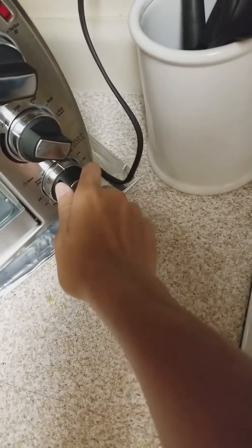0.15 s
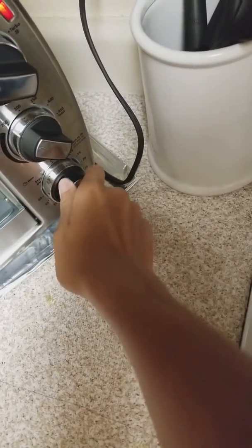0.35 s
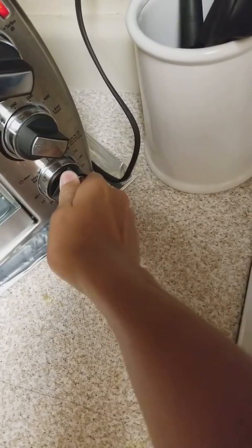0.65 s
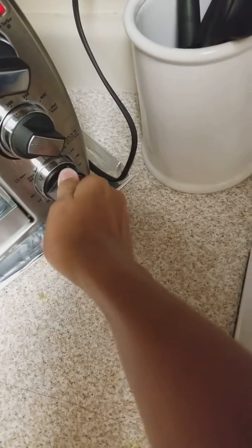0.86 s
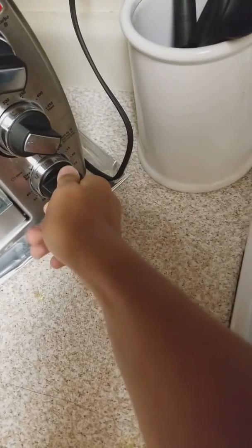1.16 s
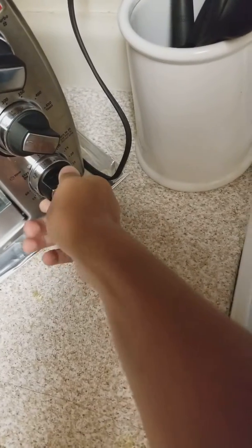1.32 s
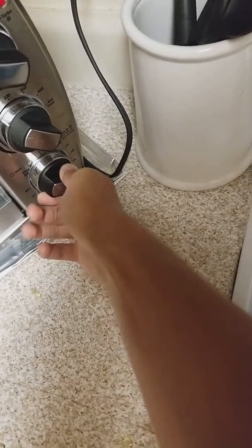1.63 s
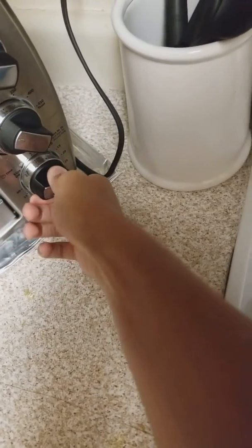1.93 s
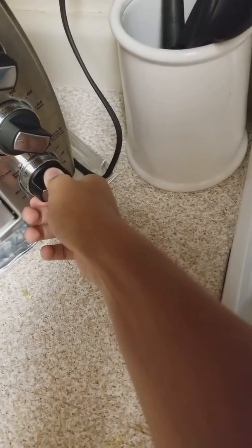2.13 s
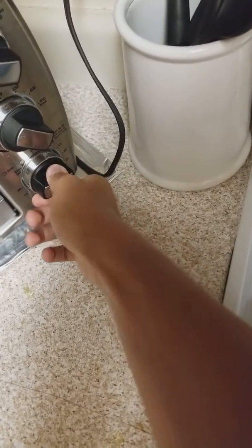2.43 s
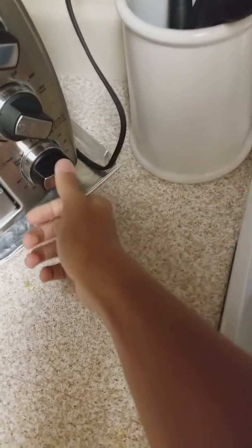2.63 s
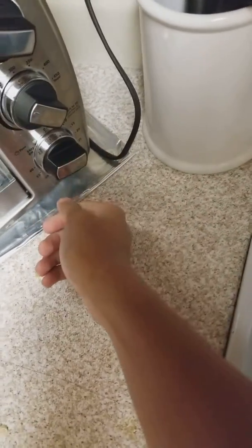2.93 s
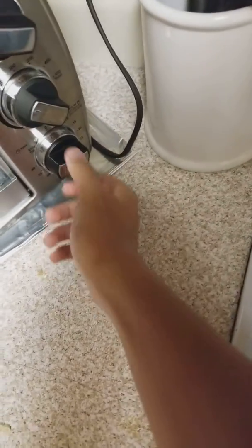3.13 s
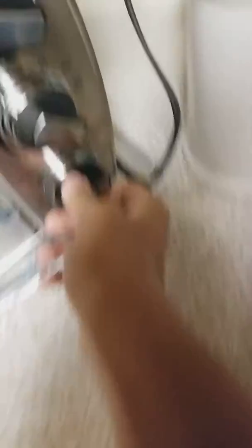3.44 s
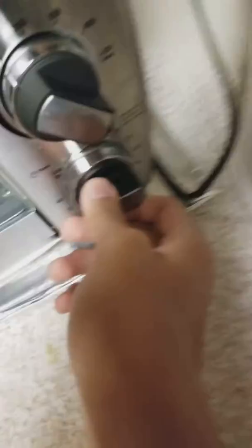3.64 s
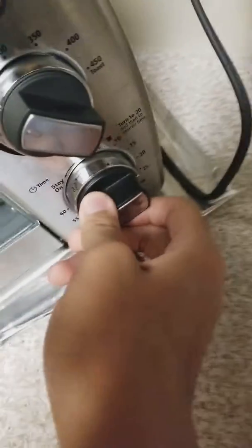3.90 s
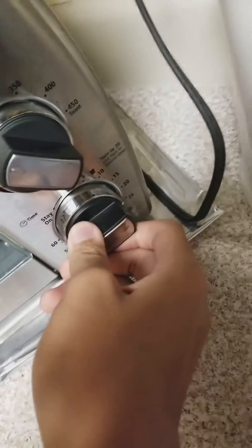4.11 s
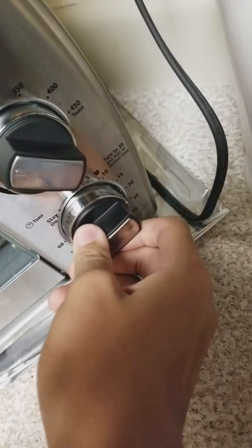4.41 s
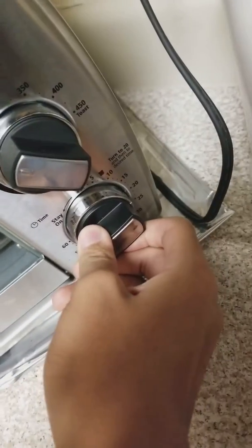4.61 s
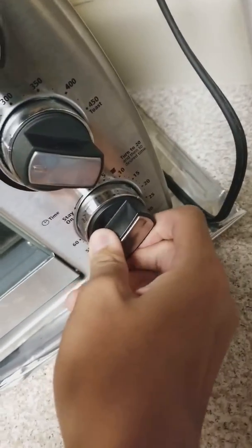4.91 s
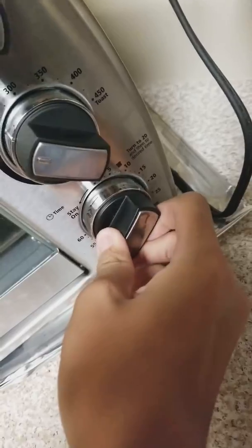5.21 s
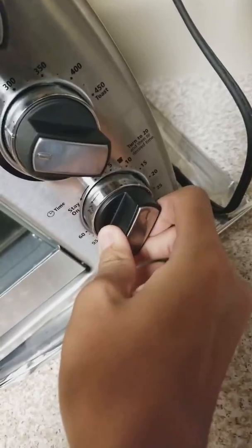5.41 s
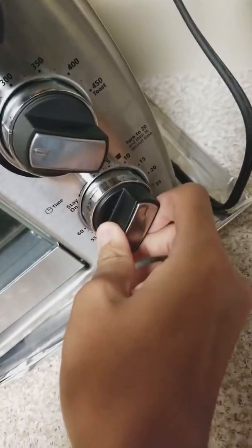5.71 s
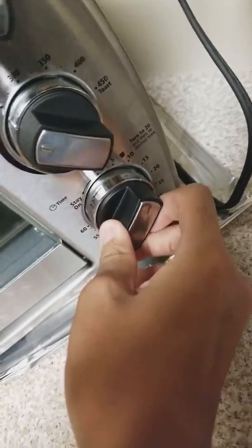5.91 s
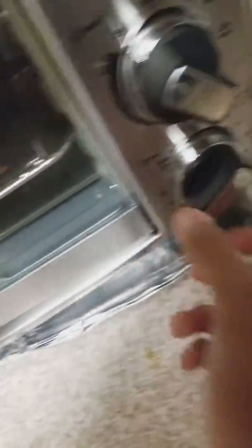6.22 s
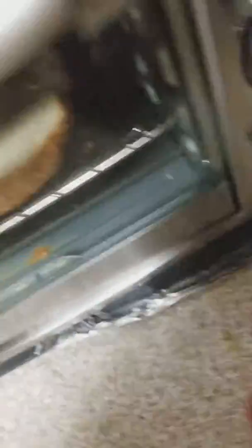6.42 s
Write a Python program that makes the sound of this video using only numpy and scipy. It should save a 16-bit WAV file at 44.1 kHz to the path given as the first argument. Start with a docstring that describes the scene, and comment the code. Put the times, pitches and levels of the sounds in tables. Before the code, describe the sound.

Ratcheting whirr of a wound toaster oven timer, then sharp metallic ticking, a knob click, short rasp and louder ticks above low electrical hum.

```python
"""In a kitchen, the clockwork timer of a toaster oven is wound by hand; its ratchet whirrs, then it ticks.
The hand takes the knob again with a click, nudges it, leans on it so that it ticks harder, and snaps off it.
Whirr, ticks and rasps are bursts of coloured noise with ringing metal; the knob's knocks are short decaying tones.
A motor and the mains hum as slightly wavering sine waves over the soft noise of the room.
About halfway through, the listening place moves close to the oven."""
import sys
import numpy as np
from scipy import signal
from scipy.fft import rfft, irfft, next_fast_len
from scipy.io import wavfile
from scipy.ndimage import uniform_filter1d, map_coordinates

SR = 44100
rng = np.random.default_rng(int(sys.argv[2]) if len(sys.argv) > 2 else 0)


def to_wav(sig):
    """Store sig (one row per channel, or 1-D mono) as 16-bit WAV at the path in sys.argv[1].

    Samples outside -1..1 are clipped; the rate is SR.
    """
    pcm = np.clip(np.atleast_2d(sig), -1, 1) * 32767
    pcm = np.round(pcm).astype(np.int16)
    wavfile.write(sys.argv[1], SR, pcm.T)  # frames by channels


N = 288855  # length [samples]
TOP_HZ = 15800  # nothing is kept at or above this frequency


def amp(db):
    """Turn decibels into a gain."""
    return 10 ** (np.asarray(db) / 20)


def unit(x):
    """Scale a sound to an average (rms) level of 1."""
    return x / np.sqrt(np.mean(x ** 2) + 1e-20)


def along(points, hz):
    """Read a curve of (frequency, value) points on a logarithmic frequency axis."""
    f, v = np.transpose(points)
    return np.interp(np.log(hz + 1), np.log(f + 1), v)


def curves(rows):
    """Draw one value per sample for each column after the time."""
    s, *cols = np.transpose(rows)
    return [np.interp(np.arange(N) / SR, s, c) for c in cols]


def wobble(rate):
    """Draw a smooth random curve through `rate` random points a second."""
    points = rng.standard_normal(int(N * rate / SR) + 4)
    return map_coordinates(points, [np.arange(N) * rate / SR])


def filtered(x, response):
    """Multiply each frequency of a sound by a response."""
    n = x.shape[-1]
    m = next_fast_len(n + 8192)  # silence added at the end leaves room for the filter's ringing
    spectrum = rfft(x, m) * response(np.fft.rfftfreq(m, 1 / SR))
    return irfft(spectrum, m)[..., :n]


def noise(colour, size):
    """Make two unrelated noises, left and right, with a given colour and rms 1."""
    white = rng.standard_normal((2, size))
    return unit(filtered(white, lambda hz: amp(along(colour, hz))))


def treble(x, edge_hz):
    """Take the part of a sound above a soft edge."""
    return filtered(x, lambda hz: hz ** 4 / (hz ** 4 + edge_hz ** 4))


def pan(db):
    """Give the gains of left and right for a left-minus-right difference in dB."""
    return amp(np.array([[db], [-db]]) / 2)


def add(track, s, sound):
    """Mix a sound into a track at time s."""
    part = track[..., max(round(s * SR), 0):][..., :sound.shape[-1]]
    part += sound[..., :part.shape[-1]]


def swells(rows):
    """Make a gain that rises to each (time, level, rise, fall) row's peak and dies away again."""
    t = np.arange(N) / SR
    return sum(amp(db - np.maximum(rise * (s - t), fall * (t - s))) for s, db, rise, fall in rows)


# Where we listen from, 0 = afar, 1 = close by: (time [s], closeness [0-1])
LISTENING_PLACE = [(3.0, 0), (3.7, 0.99)]


def closeness(s):
    """Tell how close to the oven we listen at time s; near sounds and far sounds mix by this."""
    return np.interp(s, *np.transpose(LISTENING_PLACE))


# Ringing tones of the steel case: (frequency [Hz], level [dB], time to fade by 60 dB [s])
CASE_TONES = [(1350, -3, 0.069), (1608, 1, 0.1), (1756, -3, 0.2), (1900, 2.5, 0.13), (1988, 5, 0.07),
              (2150, 1.5, 0.18), (2284, -2, 0.15), (2690, -1, 0.11), (3570, -10, 0.19), (3820, -4, 0.13),
              (4740, -17, 0.092), (5700, -5, 0.087), (6170, 1, 0.071), (7160, 1, 0.048), (8200, 4, 0.035)]


def case_ring(t):
    """Ring the case's clear tones as fading sines, with new strengths for each blow and each side."""
    ring = 0
    for hz, db, t60 in CASE_TONES:
        level_db = db + rng.normal(0, 0.62, (2, 1))
        start = rng.random((2, 1))  # in cycles
        ring = ring + amp(level_db - 60 * t / t60) * np.sin(2 * np.pi * (hz * t + start))
    return ring


def ratchet(colour, teeth_rate, scatter_db, ring_db, t60, grit_db, grit_t60=0.0024, count=8):
    """Gear teeth meet at uneven moments, each with a gritty click that rings the metal; rms 1."""
    t = np.arange(SR // 4) / SR
    meets = rng.random(N) < teeth_rate / SR  # on average teeth_rate a second
    teeth = meets * amp(scatter_db * rng.standard_normal(N))
    fade = np.hypot(amp(-60 * t / t60), amp(grit_db - 60 * t / grit_t60))
    # teeth land on different spots, so each takes one of a few responses
    spot = rng.integers(0, count, N)
    out = 0
    for k in range(count):
        response = noise(colour, len(t)) * fade + amp(ring_db) * case_ring(t)
        here = (teeth * (spot == k))[None]
        out = out + signal.oaconvolve(here, response, axes=1)[:, :N]
    return unit(out)


# Two turns of the knob with a short slackening between them, before the overall settings below:
# (time [s], level of the case's grind [dB], level of the teeth's hiss [dB])
KNOB_TURNS = [(0.31, -44, -52), (0.372, -34, -36.5), (0.432, -40, -41), (0.506, -38.5, -40.5),
              (0.544, -44.5, -43), (0.568, -36, -41), (0.586, -42, -42), (0.65, -37, -41.5),
              (0.71, -52, -50), (0.72, -41, -50), (0.73, -47, -48), (0.758, -40.5, -43.5),
              (0.842, -44, -44), (0.85, -38.5, -41.5), (0.906, -42.5, -45), (0.944, -38.5, -44.5),
              (1.0, -42, -42.5), (1.028, -35, -41), (1.056, -41, -41.5), (1.158, -42, -45.5),
              (1.412, -40, -42), (1.426, -36.5, -40.5), (1.524, -39.5, -42), (1.57, -49, -54)]
# Colour of the case's grind: (frequency [Hz], level [dB per Hz])
GRIND_COLOUR = [(150, -17), (500, -13.5), (1150, -11.5), (1350, 1), (1490, -8), (1650, -6), (1890, 3),
                (2250, -3.5), (2600, -6), (3200, -17), (5000, -44)]
# Colour of the teeth's hiss: (frequency [Hz], level [dB per Hz])
TEETH_COLOUR = [(1500, -28), (2700, 2), (3500, 0), (4500, 0), (5200, -3), (6000, -1.5), (7100, -7.5),
                (8400, -1.5), (10400, -11), (13200, -4), (14400, -13), (15800, -47)]


def winding(case_db=4.0, hiss_db=3.5, damped_db=-6):
    """The case grinds, its treble damped by the hand, and the teeth hiss through both turns of the knob."""
    grind_db, teeth_db = curves(KNOB_TURNS)
    start, stop = KNOB_TURNS[0][0], KNOB_TURNS[-1][0]
    grind = ratchet(GRIND_COLOUR, teeth_rate=1500, scatter_db=2.0, ring_db=-10.5, t60=0.06, grit_db=7.5)
    grind = grind * amp(case_db + grind_db)
    grind = grind + (amp(damped_db) - 1) * treble(grind, 4500)
    hiss = ratchet(TEETH_COLOUR, teeth_rate=900, scatter_db=2.5, ring_db=-34, t60=0.13, grit_db=5)
    hiss = hiss * amp(hiss_db + teeth_db)
    turning, = curves([(start - .002, 0), (start, 1), (stop - .005, 1), (stop + 0.068, 0)])
    return (grind * pan(-1.6) + hiss * pan(1.0)) * turning


# Beats while the hand loads the spring, some with a rebound: (time [s], level [dB], treble change [dB])
LOADED_BEATS = [(1.6261, -29.5, 1.5), (1.8281, -27.5, -4.5), (2.0548, -30, 2.5), (2.289, -28, -1),
                (3.473, -28, -1.5), (3.482, -34, -7), (3.702, -23.5, -2.5), (3.9315, -23.5, -1.5),
                (4.1588, -22.5, -3), (4.3757, -24.5, -1.5), (4.584, -21.5, -0.5), (4.592, -33, -11),
                (4.8022, -24.5, 0), (5.0118, -23.5, -4), (5.2258, -25, 0), (5.4255, -22, -6.5),
                (5.6439, -25, 0.5), (5.851, -24, -4), (6.053, -45, 3)]
# Stretches of soft, even ticking when left alone: (time of first beat [s], time of end [s])
FREE_TICKING = [(2.524, 3.32), (6.298, 6.55)]
# Clicks of the clockwork, off the even beat: (time [s], level [dB])
OFF_BEAT_CLICKS = [(1.6068, -25), (1.675, -30.5), (3.4258, -26)]


def blows(beat_s=.2368, free_db=-36.5, free_treble_db=-1, off_beat_treble_db=-13):
    """List every contact in the clockwork as (time, level, treble change); left alone it beats evenly."""
    free = []
    for first, until in FREE_TICKING:
        free += [(s, free_db, free_treble_db) for s in np.arange(first, until, beat_s)]
    off_beat = [(s, db, off_beat_treble_db) for s, db in OFF_BEAT_CLICKS]
    return LOADED_BEATS + free + off_beat


# Tones of the pallet (the rocking catch) and escape wheel, before random changes:
# (frequency [Hz], level [dB], time to fade by 60 dB [s])
PALLET_TONES = [(1744, -5.5, 0.029), (3240, -12, 0.0091)]


def pallet_pings(t, spread=0.088, scatter_db=3):
    """The pallet rings short and sharp, at a new pitch and strength for each blow."""
    pings = 0
    for hz, db, t60 in PALLET_TONES:
        level_db = db + rng.normal(0, scatter_db)
        pitch_hz = hz * np.exp(rng.normal(0, spread))
        phase = rng.normal(0, 1.0, (2, 1))
        pings = pings + amp(level_db - 60 * t / t60) * np.sin(2 * np.pi * pitch_hz * t + phase)
    return pings


# Colour of the shaken clockwork and case: (frequency [Hz], level [dB per Hz])
METAL_COLOUR = [(500, -52), (1100, -2.5), (1800, 4), (2450, 2), (3500, 3.5), (4900, 0), (6000, 2.5),
                (7100, -4.5), (8400, 0), (9600, -6.5), (11000, -11), (12500, -1), (14200, -4.5),
                (16000, -29)]
# Colour of the pallet's dry landing: (frequency [Hz], level [dB per Hz])
LANDING_COLOUR = [(600, -40), (1200, -1), (1700, 5), (2600, -18), (6000, -6), (14000, -5)]


def ticks(t60=0.18, tail_t60=1.0, tail_db=-19, clack_db=-4, clack_t60=0.06, lead_s=0.0056, lead_db=-15,
          rise_s=0.00087, same=0.58, chatter_db=2.5, ring_far_db=-9, ring_near_db=-16):
    """The pallet unlocks faintly, then lands with a clack and a ping and shakes the clockwork and case."""
    out, t = np.zeros((2, N)), np.arange(SR // 3) / SR
    metal = noise(METAL_COLOUR, len(t))
    # the clockwork dies fast, the oven's cavity hangs on faintly
    fade = np.hypot(amp(-60 * t / t60), amp(tail_db - 60 * t / tail_t60))
    fade = fade * np.minimum(1, 4 * (1 - t / t[-1]))  # the last quarter runs down to silence
    for s, db, treble_db in blows():
        ring_db = ring_far_db + (ring_near_db - ring_far_db) * closeness(s)
        # the crowded tones of the metal: partly the same in every blow, partly new
        crowd = np.sqrt(same) * metal + np.sqrt(1 - same) * noise(METAL_COLOUR, len(t))
        crowd = crowd + (amp(treble_db) - 1) * treble(crowd, 2300)
        # every tooth of the escape wheel favours other clusters of tones
        clusters_db = rng.normal(-.5, 3.2, 120)
        cluster_hz = np.linspace(0, TOP_HZ, len(clusters_db))
        crowd = filtered(crowd, lambda hz: amp(np.interp(hz, cluster_hz, clusters_db)))
        # loose gear teeth chatter for the first hundredths of a second
        rattle = unit(uniform_filter1d(rng.standard_normal(len(t)), size=50))
        chatter = amp(chatter_db * rattle * np.exp(-t / 0.018))
        shake = crowd * fade * chatter + amp(ring_db) * case_ring(t)
        shake = shake * (1 - np.exp(-t / rise_s))
        clack = noise(LANDING_COLOUR, len(t)) * amp(clack_db - 60 * t / clack_t60)
        beat = amp(db - 9.0) * (shake + clack + pallet_pings(t))
        add(out, s - lead_s, amp(lead_db) * beat)  # unlocking
        add(out, s, beat)  # landing
    return out * pan(-0.26)


# A quick bright shove of the knob, then a slow duller one:
# (time of peak [s], level [dB], rise [dB per s], fall [dB per s], treble change [dB])
KNOB_SHOVES = [(3.549, -34.5, 1200, 239, 2), (3.675, -39.5, 124, 85, -4.5)]
# Colour of the nudge's rasp: (frequency [Hz], level [dB per Hz])
NUDGE_COLOUR = [(1000, -40), (1700, -24), (2100, -5.5), (2750, 0.5), (3300, -7), (4400, -6.5),
                (5560, -12.5), (6500, -15), (9000, -13), (12500, -4.5), (14300, -14), (15800, -28)]


def nudge():
    """Gear teeth rasp briefly, swelling and dying with each shove of the knob."""
    rasp = ratchet(NUDGE_COLOUR, teeth_rate=1200, scatter_db=2.5, ring_db=-31, t60=0.078, grit_db=-3)
    bright = treble(rasp, 4500)
    out = 0
    for *shove, treble_db in KNOB_SHOVES:
        out = out + (rasp + (amp(treble_db) - 1) * bright) * swells([shove])
    return out * pan(-2.5)


# The knob knocks on its shaft, before the overall level: (time [s], level [dB], left minus right [dB],
# delay of the right side [ms], pitch factor, share of snap, level of thud [dB])
KNOB_KNOCKS = [(3.3195, -37, 8, 0, 1.8, 2.2, -24), (3.3603, -16.3, 3, 0, .95, .52, -6),
               (6.0792, -17, -6, -.5, 1.11, .88, -10.5)]
# Plastic knob, before the pitch factor: (frequency [Hz], level [dB], time to fade by 60 dB [s])
KNOB_TONES = [(2080, -1, 0.0062), (2560, -1.5, 0.0052), (3200, -5, 0.004), (4200, -3.5, 0.0048),
              (5600, -13, 0.003), (7100, -12, 0.003)]
# Front panel behind the knob: (frequency [Hz], level [dB], time to fade by 60 dB [s])
PANEL_TONES = [(290, -10, .016), (520, -4.5, 0.02), (855, -5, 0.011)]


def knocks(crack_t60=0.0052):
    """Fingers take and leave the knob: a dry snap, a few cycles of plastic and a thud of the panel."""
    out, t = np.zeros((2, N)), np.arange(SR // 20) / SR
    # (frequency [Hz], level [dB per Hz])
    snap_colour = [(1000, 6), (3500, -2), (6000, -4), (12000, -1.0), (15000, -18)]
    for s, db, side_db, lag_ms, pitch, snap, thud_db in KNOB_KNOCKS:
        thud = 0
        for hz, level, t60 in PANEL_TONES:
            thud = thud + amp(thud_db + level - 60 * t / t60) * np.sin(2 * np.pi * hz * t)
        for ear, sign in enumerate((1, -1)):  # left, right
            ring = 0
            for k, (hz, level, t60) in enumerate(KNOB_TONES):
                tone = np.sin(2 * np.pi * hz * pitch * t + rng.normal(0, 0.3))
                # neighbouring tones swing in opposite senses
                ring = ring + (-1) ** k * amp(level - 60 * t / t60) * tone
            crack = snap * amp(-60 * t / crack_t60) * noise(snap_colour, len(t))[ear]
            click = (ring + crack - thud) * (1 - np.exp(-t / 0.00013))
            delay_s = max(-sign * lag_ms, 0) * 1e-3
            add(out[ear], s + delay_s, amp(db + sign * side_db / 2) * click)
    return out * amp(-1.7)


# Fingers brush the knob as they take it and slide off it:
# (time of peak [s], level [dB], rise [dB per s], fall [dB per s])
FINGER_BRUSHES = [(3.343, -47.5, 599, 350), (3.908, -50, 500, 402), (6.078, -41.5, 800, 330)]
# Colour of skin on plastic: (frequency [Hz], level [dB per Hz])
SCUFF_COLOUR = [(900, -33), (2500, 5), (4500, -2), (7000, -13), (12500, -3), (15800, -22)]


def brushes(grain_db=1.0):
    """Fingertips slide over the knob: noise with a fine grain, swelling and fading."""
    scuff = unit(noise(SCUFF_COLOUR, N) * amp(grain_db * wobble(700)))
    return scuff * swells(FINGER_BRUSHES)


def hum(partials, hz, close, drift, flutter_db):
    """Slightly wavering tones at multiples of one pitch, with levels that follow the listening place."""
    cycles = hz * np.arange(N) / SR + drift * wobble(1.635)
    out = 0
    for k, far_db, near_db in partials:
        # the upper tones flutter more
        db = far_db + (near_db - far_db) * close + flutter_db * np.log(k + 1) * wobble(5)
        out = out + amp(db) * np.sin(2 * np.pi * (round(k) * cycles + rng.random()))
    return np.sqrt(2) * out  # makes the levels rms


# Hum of the kitchen motor: (multiple of the base pitch, level from afar [dB], level close by [dB])
MOTOR_TONES = [(1, -37, -36.5), (2, -44.5, -44.5), (3, -70, -55.5), (4, -43.5, -43), (8, -54, -50.5),
               (12, -62.5, -59), (16, -68.5, -82), (20, -58.5, -65)]
# Hum of the mains: (multiple of the base pitch, level from afar [dB], level close by [dB])
MAINS_TONES = [(1, -38.5, -36.5), (2, -57.5, -54.5)]


def hums(close):
    """The motor and the mains each hum around their own base pitch."""
    motor = hum(MOTOR_TONES, 51.735, close, drift=0.0069, flutter_db=0.67)
    mains = hum(MAINS_TONES, 120.02, close, drift=.002, flutter_db=0.8)
    return motor * pan(0.99) + mains * pan(1.7)


# How alike left and right are: (frequency [Hz], likeness [0-1])
LIKENESS = [(120, 0.97), (250, 0.55), (500, 0.47), (1000, 0.14), (2000, 0), (5000, 0.02)]


def diffuse(pair):
    """Spread noise like a room: alike at both ears in the bass, unrelated in the treble."""
    def shares(hz):
        turn = np.arccos(np.clip(along(LIKENESS, hz), -1, 1)) / 2
        return np.array([np.cos(turn), np.sin(turn)])

    mid, side = filtered(pair, shares)
    return unit(np.array([mid + side, mid - side]))


# Colour of the kitchen air from afar: (frequency [Hz], level [dB per Hz])
FAR_AIR_COLOUR = [(160, -81), (280, -9), (386, -4.5), (406, -4), (569, -12), (709, -4.5), (784, -10),
                  (1010, -9.5), (1100, -10.5), (1650, -13), (1790, -12), (2050, -15), (3200, -21),
                  (5370, -31.5), (8000, -25.5), (10500, -33), (12600, -27.5), (14300, -41), (15800, -75)]
# Colour of the kitchen air close by: (frequency [Hz], level [dB per Hz])
NEAR_AIR_COLOUR = [(160, -29), (280, 3.5), (355, -5), (420, -1), (473, -12.5), (609, -3.5), (674, -9),
                   (733, -5.5), (928, -7.5), (1460, -8), (2020, -12), (2930, -15), (3830, -20.5),
                   (8000, -25.5), (10500, -27.5), (12800, -26), (14400, -32), (15800, -58)]
# Colour of the low rumble: (frequency [Hz], level [dB per Hz])
RUMBLE_COLOUR = [(12, -19), (25, -4), (42, -29), (55, 4.5), (80, -4), (110, 0), (135, 1), (185, -6.5),
                 (210, 1), (235, -7), (300, -11), (420, -48)]
# Hollows around the oven that colour the air close by: (frequency [Hz], width [Hz], level [dB])
OVEN_HOLLOWS = [(275, 62, -21.5), (464, 95, -20), (734, 18, -12.5)]


def kitchen():
    """Motor and mains hum over a rumble and the rush of the room, whose colour changes as we move closer."""
    close = np.clip(closeness(np.arange(N) / SR), 0, 1)
    far = amp(-45.5) * diffuse(noise(FAR_AIR_COLOUR, N))
    near = amp(-45.0) * diffuse(noise(NEAR_AIR_COLOUR, N))

    def cavities(f):
        return sum(amp(db) * (f * width) ** 2 / ((centre ** 2 - f ** 2) ** 2 + (f * width) ** 2)
                   for centre, width, db in OVEN_HOLLOWS)

    hollow = amp(-52.0) * diffuse(filtered(rng.standard_normal((2, N)), cavities))
    rumble = amp(-43.5) * diffuse(noise(RUMBLE_COLOUR, N)) * pan(0.81)
    air = np.sqrt(1 - close) * far + np.sqrt(close) * (near + hollow)
    return hums(close) + rumble + air


def scene():
    """The timer and its knob in the humming kitchen."""
    return winding() + ticks() + nudge() + knocks() + brushes() + kitchen()


def record(dry):
    """The high treble is raised on the right and lowered on the left; all sound stops at the top frequency."""
    ports = dry + (pan(-5.0) - 1) * treble(dry, 10400)
    return filtered(ports, lambda hz: hz < TOP_HZ)


dry = scene()
out = record(dry)
to_wav(out)
```